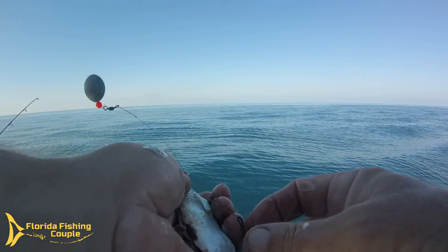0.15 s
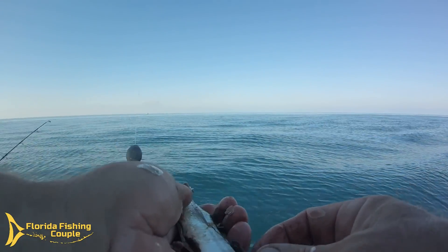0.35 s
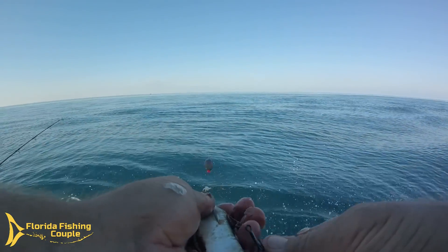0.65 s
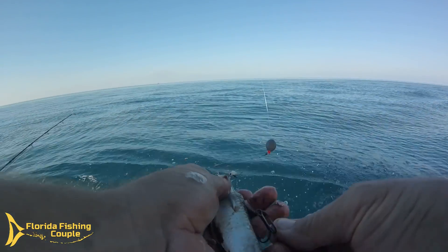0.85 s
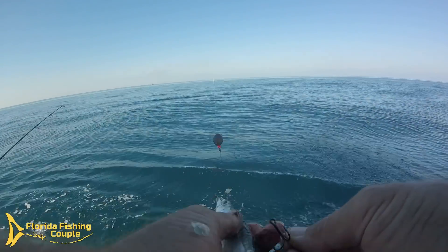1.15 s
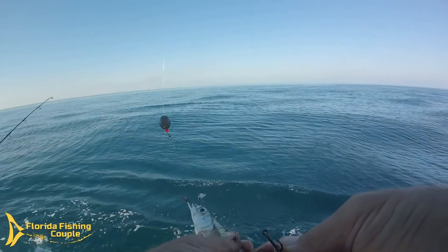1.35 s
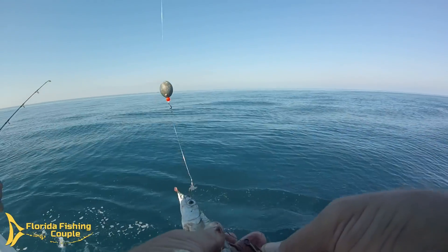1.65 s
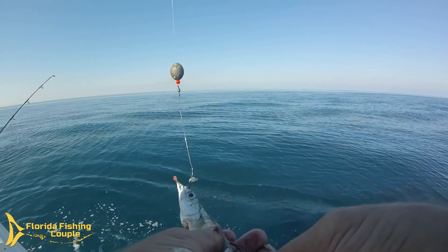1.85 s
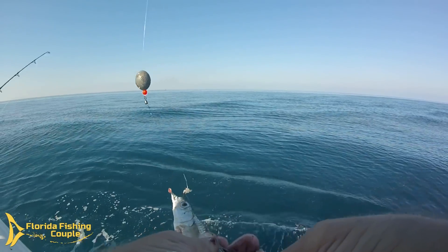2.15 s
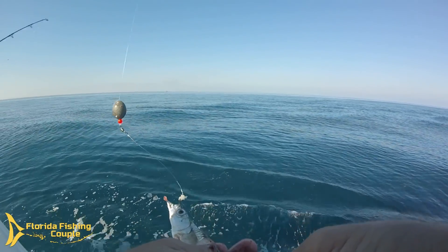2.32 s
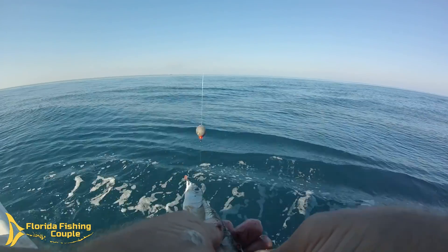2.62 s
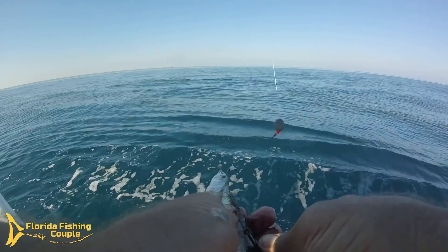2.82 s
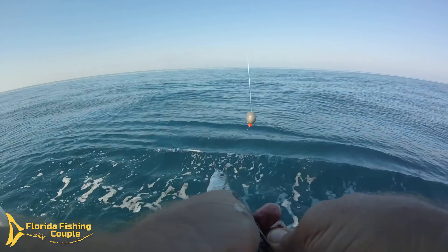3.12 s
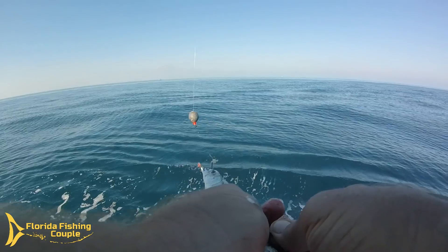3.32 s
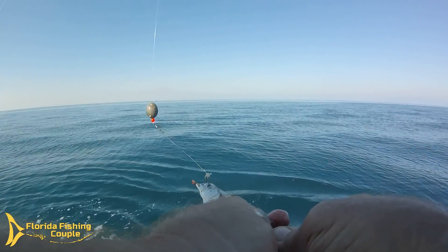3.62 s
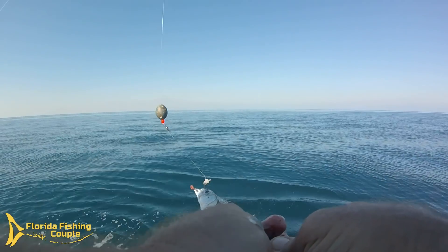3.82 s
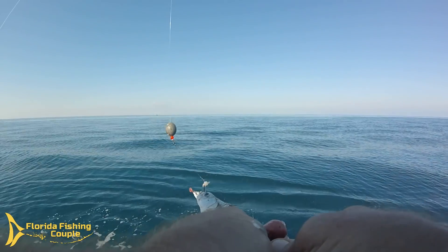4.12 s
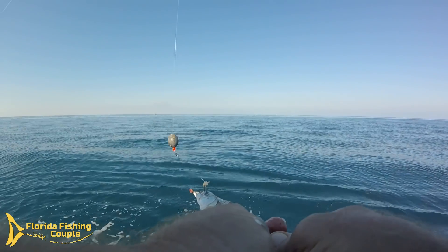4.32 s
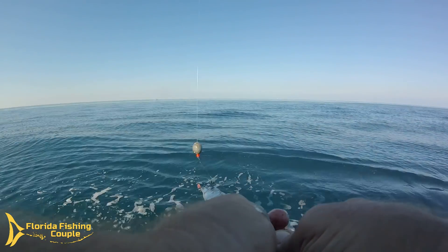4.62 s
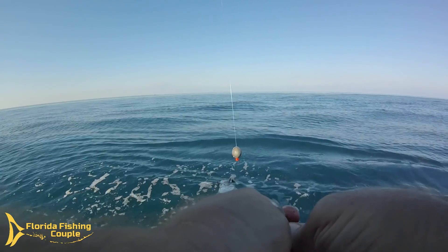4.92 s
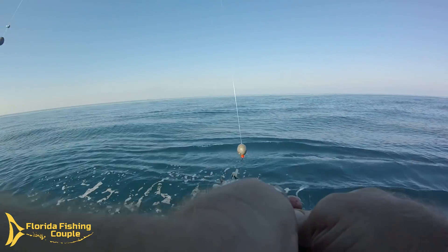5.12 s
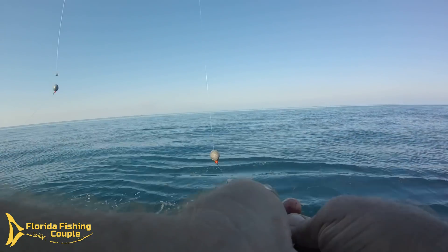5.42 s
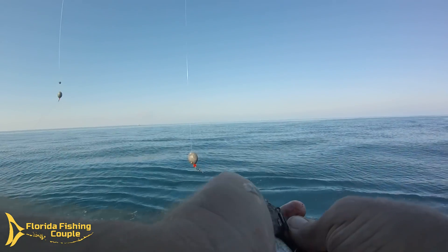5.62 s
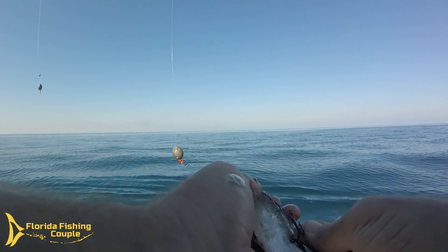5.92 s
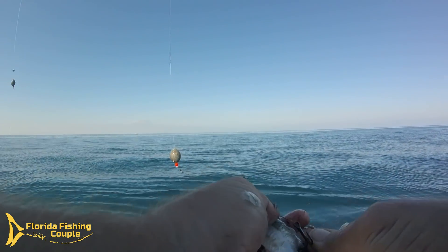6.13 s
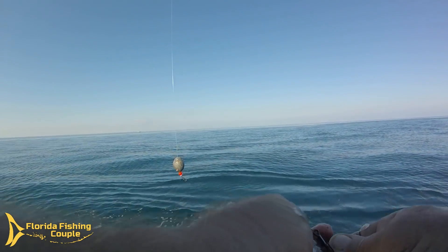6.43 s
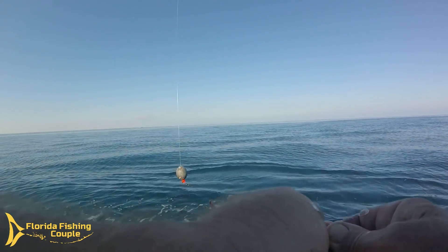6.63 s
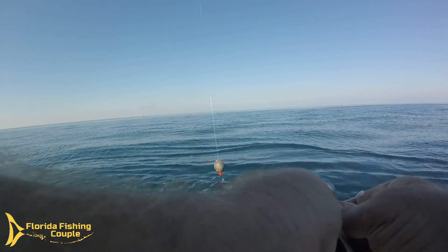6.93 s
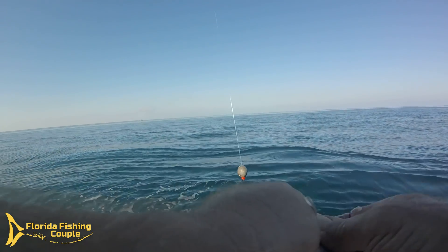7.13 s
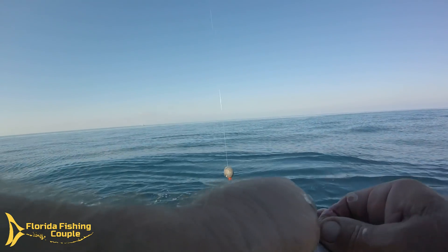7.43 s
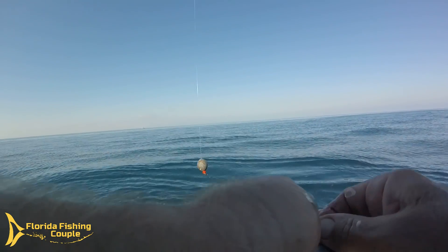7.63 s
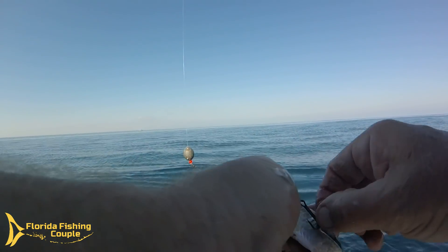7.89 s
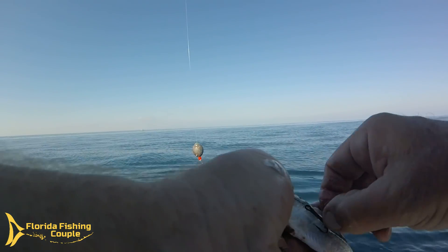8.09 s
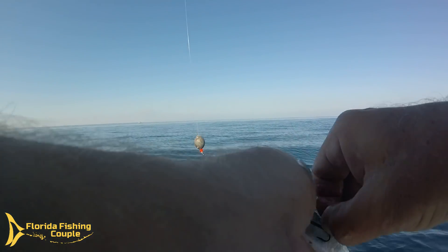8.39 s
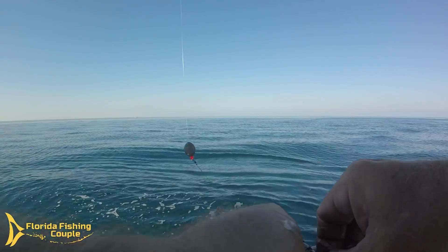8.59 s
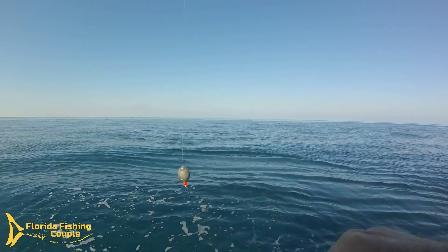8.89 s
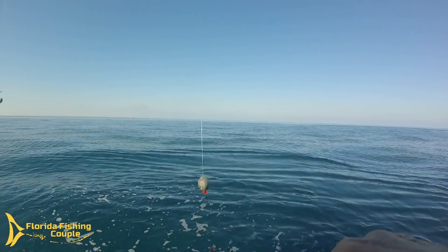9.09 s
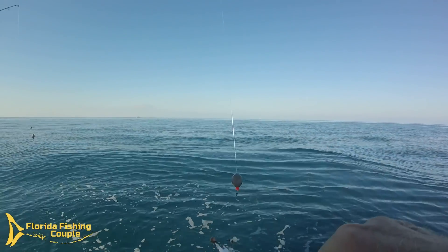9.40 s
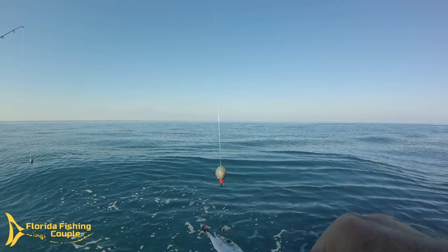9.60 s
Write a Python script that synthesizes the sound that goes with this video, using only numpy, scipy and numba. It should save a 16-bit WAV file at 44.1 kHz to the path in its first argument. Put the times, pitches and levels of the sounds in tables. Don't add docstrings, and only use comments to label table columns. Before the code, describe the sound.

Close water slaps and gurgles under a boat on calm sea, busiest in the first five seconds, then sparse laps over soft breeze rumble.

```python
import sys
import numpy as np
from scipy import signal
from scipy.fft import rfft, irfft
from scipy.io import wavfile
from scipy.ndimage import uniform_filter1d
from numba import njit

SR = 44100
rng = np.random.default_rng(int(sys.argv[2]) if len(sys.argv) > 2 else 0)


def level_to_linear(level):
    exponent = np.asarray(level, float) / 20
    return 10 ** exponent


def unload_wav(signal):
    wavfile.write(
        sys.argv[1],
        SR,
        np.round(np.clip(np.atleast_2d(signal).T, -1, 1) * 32767).astype(np.int16),
    )


N = 429974

# (time [s], crack level [dB], pocket pitch [Hz], pocket level [dB], spray level [dB])
HARD_SLAPS = [(0.441, -37, 243, -30, -29), (0.463, -16, 600, -16, -46), (0.662, -29, 700, -34, -38),
              (0.692, -30, 477, -11.5, -51), (0.883, -38, 400, -21.5, -38), (1.228, -29, 579, -48, -47),
              (1.672, -24.5, 270, -25, -71), (2.411, -34, 398, -42, -37), (2.44, -34, 210, -27, -38),
              (2.632, -27, 301, -29, -42.5), (2.651, -31, 640, -36, -39), (6.483, -42, 1180, -42, -58),
              (0.739, -32, 302, -28, -36), (2.464, -26, 395, -15, -44), (2.66, -36, 220, -29, -43),
              (2.681, -13, 690, -11.5, -26.5), (2.831, -29, 202, -46, -51), (3.863, -31, 205, -46, -44),
              (3.989, -34, 743, -28, -47), (4.431, -40, 200, -34, -44), (4.454, -33, 222, -31, -43),
              (4.485, -25, 778, -47, -43), (4.542, -23.5, 248, -33, -35.5), (6.503, -22, 358, -18, -43),
              (8.128, -37, 865, -58, -42.5), (8.15, -43, 950, -43, -35), (8.472, -32.5, 226, -53, -47.5),
              (8.846, -38, 256, -24, -52)]
# (time
# [s], crack level [dB], pocket pitch [Hz], pocket level [dB])
SOFT_LAPS = [(0.282, -40, 630, -38), (1.577, -29, 600, -36), (1.5, -54, 330, -32.5), (1.703, -35, 290, -20),
             (1.897, -34, 410, -26.5), (2.783, -43, 490, -29), (3.517, -37, 366, -33),
             (3.575, -48, 570, -39), (3.629, -39, 390, -38), (3.824, -34, 202, -40), (3.939, -31, 190, -30),
             (4.524, -40, 280, -21), (6.515, -29, 320, -21), (6.607, -39, 300, -40), (9.214, -38, 320, -45),
             (4.332, -31.5, 537, -37), (4.582, -29, 1200, -33), (4.756, -32, 230, -46),
             (4.79, -36, 900, -45), (6.68, -38, 2300, -37), (6.504, -34, 1500, -30),
             (6.513, -40, 1200, -26), (4.547, -38, 1800, -28), (0.455, -24, 2000, -26),
             (5.171, -36, 1700, -40), (4.558, -45, 327, -20), (2.493, -32, 340, -20),
             (4.875, -34.5, 170, -40), (4.951, -35.5, 245, -31), (5.3, -43, 1200, -44),
             (8.434, -46, 3100, -48), (5.722, -42, 1500, -48), (2.482, -40, 210, -18),
             (8.178, -44, 2200, -42), (7.038, -36.5, 380, -37.5), (7.826, -50, 340, -39),
             (8.517, -40, 220, -40), (8.565, -34, 277, -32.5), (8.827, -45, 220, -42),
             (8.846, -40, 2000, -33), (2.476, -19, 280, -29), (4.511, -29, 1450, -28), (0.9, -38, 120, -21)]
# (crest time [s], 10 dB fall time [ms], gulping [dB], bubbling [dB], spray [dB])
SWELLS = [(0.027, 150, -53, -61, -64), (0.755, 850, -61, -46, -54), (0.81, 230, -32.5, -63, -42.5),
          (1.86, 390, -36, -42, -57), (2.668, 294, -34.5, -46, -53.5), (3.892, 1171, -46.5, -50.5, -65),
          (4.667, 252, -39.5, -47.5, -59), (5.935, 413, -49, -51.5, -63.5), (6.657, 195, -45.5, -54.5, -67),
          (6.875, 313, -51.5, -59.5, -69), (8.924, 494, -50.5, -58.5, -68.5)]
# (peak time [s], 10 dB fall time [ms], level [dB])
GULPS = [(0.002, 109, -35.5), (0.36, 84, -35.5), (0.477, 23, -20.5), (0.717, 53, -24.5), (0.886, 50, -28),
         (1.374, 67, -38.5), (1.5, 22, -29.5), (1.716, 300, -35), (2.47, 40, -22), (2.682, 33, -23.5),
         (2.854, 82, -35), (3.333, 69, -43.5), (3.475, 76, -42.5), (3.565, 24, -36), (3.829, 200, -33.5),
         (4.549, 69, -24.0), (4.6, 80, -51), (4.759, 23, -26), (4.825, 136, -37), (5.3, 210, -49),
         (5.781, 22, -36), (5.947, 228, -48), (6.516, 28.5, -23.5), (7.53, 44, -47.5), (7.59, 35, -36),
         (8.516, 69, -37), (8.852, 22, -34.5), (9.228, 25, -40)]
# (peak time [s], 10 dB fall time [ms], bubbling level [dB], spray level [dB])
SPLASHES = [(0, 120, -36, -43), (0.46, 32, -22, -27.5), (0.695, 26, -28.5, -74.0), (0.775, 170, -33, -35.5),
            (0.878, 41, -32, -35), (1.238, 135, -40, -46.5), (1.698, 218, -40.5, -73),
            (1.951, 131, -36.5, -48.5), (2.447, 35, -28, -37), (2.472, 38, -31, -45), (2.677, 72, -30, -45),
            (2.821, 252, -42, -52.5), (3.7, 226, -45, -57.5), (3.911, 158, -39, -49.5),
            (4.07, 25, -45, -56), (4.5, 126, -55, -48), (4.53, 17, -32, -39.5), (4.765, 120, -44.5, -51),
            (5.177, 64, -49.5, -63), (5.383, 310, -54, -63.5), (5.928, 300, -69, -58),
            (6.233, 18, -50, -48), (6.516, 25, -31, -41), (6.61, 156, -55, -63), (6.632, 39, -60, -52),
            (0.925, 38, -37, -44), (6.87, 74, -51.5, -79), (8.156, 24.5, -42, -43), (8.512, 93, -44.5, -62),
            (8.775, 22, -54, -47), (8.845, 24, -43.5, -52), (9.05, 66, -55.5, -80), (9.23, 30, -49, -64)]
# (time [s], pitch [Hz], level [dB])
PLOPS = [(0.012, 1164, -39), (0.285, 820, -45), (0.462, 1176, -30), (0.608, 810, -51), (0.695, 713, -23),
         (0.86, 370, -24), (0.873, 390, -34), (0.884, 1140, -40), (0.901, 414, -29), (1.025, 910, -48),
         (1.136, 825, -43), (1.148, 369.5, -37), (1.553, 1030, -47), (1.737, 1090, -39), (1.911, 416, -33),
         (2.015, 338, -25), (2.067, 407, -28.5), (2.226, 897, -47), (1.792, 1450, -41), (2.454, 390, -19.5),
         (2.467, 387, -22), (2.482, 700, -31), (2.683, 1126, -32), (3.464, 946, -47), (3.548, 410, -31),
         (3.61, 372, -33), (3.771, 300, -31), (3.906, 1215, -39), (3.944, 1290, -40), (4.08, 670, -41),
         (4.093, 317, -34), (4.268, 1150, -47), (4.336, 540, -46), (4.364, 900, -45), (4.39, 850, -50),
         (4.502, 750, -35), (4.6, 1130, -43), (4.738, 1110, -41), (4.825, 295, -28.5), (4.88, 788, -42),
         (3.752, 1450, -45), (5.177, 1090, -48), (5.388, 950, -50), (5.655, 938, -54), (6.179, 643, -46),
         (6.254, 318, -37.5), (6.508, 347, -21), (6.527, 1215, -43), (6.635, 735, -45), (6.73, 1260, -54),
         (6.809, 1170, -53), (6.921, 425, -46), (6.952, 790, -48), (7.613, 322, -41), (8.111, 880, -56),
         (8.159, 954, -44), (8.831, 784, -47), (8.848, 1250, -49), (8.95, 730, -50), (8.015, 700, -56)]
# (time [s], pitch [Hz], level [dB])
PLINKS = [(0.002, 4480, -44), (0.444, 6420, -37), (0.461, 6500, -30), (0.472, 6610, -30),
          (0.508, 2270, -35), (0.708, 4520, -38), (0.724, 5150, -42), (0.741, 3440, -29),
          (0.756, 5060, -43), (0.82, 6460, -40), (0.877, 6050, -38), (0.884, 2090, -27), (0.901, 2580, -32),
          (1.018, 3620, -41), (1.42, 2006, -42), (1.443, 6570, -45.5), (1.758, 1750, -34),
          (1.788, 3880, -44), (2.306, 2360, -45), (2.414, 1440, -26), (2.443, 6350, -43),
          (2.476, 1520, -28), (2.496, 5120, -47), (2.683, 2070, -22), (2.741, 4750, -43),
          (3.318, 5790, -48.5), (3.676, 6400, -52), (3.864, 5370, -42), (3.993, 6320, -45.5),
          (4.055, 5900, -42), (4.066, 1735, -39), (4.433, 6340, -43), (4.489, 1430, -28.5),
          (4.527, 6330, -38), (4.549, 6470, -35.5), (4.591, 3790, -54), (4.786, 6370, -48),
          (4.433, 2050, -40), (5.584, 3035, -56), (5.722, 2000, -48), (5.914, 2000, -44.5),
          (6.248, 4870, -54), (6.505, 6740, -35), (6.518, 3800, -52), (6.529, 1550, -24),
          (6.535, 5060, -47), (6.564, 4010, -58), (6.576, 5330, -46), (7.074, 6300, -48),
          (7.247, 5270, -53), (8.133, 4900, -46), (8.151, 6400, -41), (8.771, 6030, -44),
          (8.849, 1640, -33), (9.088, 3230, -51.5)]
# (time [s], start pitch
# [Hz], end pitch [Hz], length [s], level [dB])
SINGING_BUBBLES = [(2.114, 490, 790, 0.034, -48), (2.196, 756, 930, 0.018, -50),
                   (2.25, 860, 1300, 0.024, -47), (2.298, 230, 240, 0.035, -36.5),
                   (2.358, 836, 1100, 0.017, -55), (2.84, 195.6, 213, 0.1, -43),
                   (3.12, 450, 508, 0.13, -57), (3.517, 366, 411, 0.071, -41.5),
                   (4.035, 180, 760, 0.055, -40), (4.288, 560, 1080, 0.04, -53),
                   (5.015, 580, 860, .03, -53), (4.33, 539, 527, 0.043, -48), (4.381, 825, 870, 0.016, -42),
                   (5.17, 1055, 1150, 0.02, -48), (5.43, 150, 140, .09, -46), (0.48, 127, 86, 0.07, -26),
                   (5.93, 206.4, 223, 0.21, -49), (6.045, 512, 720, 0.028, -49.5),
                   (6.833, 424, 471, 0.091, -51.5), (7.05, 171.4, 151, 0.16, -48),
                   (8.967, 735, 740, 0.026, -55), (6.76, 134, 150, 0.18, -48), (6.98, 145, 159, 0.055, -49),
                   (8.95, 131, 162, 0.059, -50), (9.125, 134.5, 174, 0.08, -49),
                   (4.254, 956, 1200, 0.019, -53), (8.946, 437, 453, 0.088, -56.5),
                   (9.049, 199, 800, 0.066, -49), (9.215, 292, 127, 0.026, -39.5),
                   (7.503, 150.3, 124, 0.03, -38.5)]
# (time [s], peak level [dB])
SMACKS = [(2.6314, -33), (2.6534, -31), (2.9966, -37), (4.4313, -31), (4.6189, -43), (4.6364, -38),
          (4.6798, -42), (4.7501, -38), (4.7684, -35), (4.8054, -43), (4.9596, -44), (8.4706, -44)]
# (peak time [s], 10 dB fall time [ms], level [dB])
GUSTS = [(0.012, 19, -35.0), (0.513, 60, -25), (0.77, 50, -26.5), (0.935, 144, -33.5), (1.266, 29, -33.5),
         (1.406, 47, -31.5), (1.665, 159, -33.5), (2.022, 91, -28.5), (2.291, 64, -35.0),
         (2.508, 66, -22.5), (2.679, 398, -33.5), (2.817, 31, -32), (3.33, 54, -17), (3.475, 61, -21),
         (3.82, 157, -31.5), (4.159, 24, -41), (4.61, 126, -32.5), (5.167, 29, -37), (5.421, 60, -34.5),
         (5.736, 800, -44), (5.739, 38, -36), (6.221, 241, -39), (6.561, 93, -34.5), (7.262, 71, -38.5),
         (7.503, 125, -37.5), (7.776, 61, -39), (8.185, 43, -46), (8.508, 84, -26.5), (8.863, 53, -41),
         (9.115, 121, -39.5)]
# (frequency [Hz], density [dB per Hz])
SPLASH_SPECTRUM = [(55, -34.5), (90, 1.5), (190, -1.5), (290, -5), (390, -5.5), (550, -9), (700, -9),
                   (1340, -16.5), (2100, -20.5), (4200, -36), (5000, -29), (6400, -31.5), (7300, -38),
                   (11500, -52.5), (15000, -83)]
# (frequency [Hz], density [dB per Hz])
BUFFET_SPECTRUM = [(12, -36), (20, -5), (35, 1), (60, 0), (95, -3), (145, -16), (231, -23.5), (390, -67),
                   (900, -120)]
# (frequency [Hz], density [dB per Hz])
HISS_SPECTRUM = [(60, -34.5), (100, 0.5), (284, -14), (420, -21), (560, -26), (2350, -28), (4400, -37.5),
                 (5200, -44), (6500, -24.5), (7500, -27), (10500, -34), (12000, -32), (13500, -36.5),
                 (15000, -64)]

SWELL_RISE, GULP_RISE, SPLASH_RISE, GUST_RISE = 0.67, 0.46, 0.43, 0.62
CALM_GULP_DB, CALM_BUBBLE_DB, CALM_SPRAY_DB, CALM_BREEZE_DB = -63, -64.5, -71.5, -51


def slaps(crack_s=0.0045, rise_s=0.00076, pocket_cycles=11, sag=0.75):
    lap_spray_db = -44
    laps = [(*lap, lap[1] + lap_spray_db) for lap in SOFT_LAPS]
    s, crack_db, hz, pocket_db, spray_db = np.transpose(HARD_SLAPS + laps)
    out = ring(N, s * SR, hz, pocket_cycles + 0 * s, sag + 0 * s, level_to_linear(pocket_db + 0.5), 0.18)
    t = np.arange(SR // 20) / SR
    burst = np.exp(-t / crack_s) * (1 - np.exp(-t / rise_s))
    for db, lo_hz, hi_hz, gain_db in ((crack_db, 500, 3800, -4), (spray_db, 3000, 11000, 1.5)):
        kicks = np.zeros(N)
        kicks[(s * SR).astype(int)] = level_to_linear(db + gain_db)
        envelope = np.maximum(signal.fftconvolve(kicks, burst)[:N], 0)
        grit = colour(rng.standard_normal(N), SPLASH_SPECTRUM)
        grit = level(band(grit, lo_hz, hi_hz), 0) * envelope
        out = out + band(grit, 0.92 * lo_hz, 0.88 * hi_hz)
    return out


def waves():
    swell = [surge(SWELLS, column, SWELL_RISE) for column in range(2, 5)]
    gulp_power = level_to_linear(2 * CALM_GULP_DB) + swell[0] + surge(GULPS, column=2, rise=GULP_RISE)
    bubble_power = level_to_linear(2 * CALM_BUBBLE_DB) + swell[1] + surge(SPLASHES, column=2, rise=SPLASH_RISE)
    spray_power = level_to_linear(2 * CALM_SPRAY_DB) + swell[2] + surge(SPLASHES, column=3, rise=SPLASH_RISE)
    gulps = swarm(85.0, 493.6, 12.0, 1.136, 1.5, -4.0, 2.5, count=1500)
    gulps = steady(band(gulps, 114, 600), 0.079)
    bubbles = steady(swarm(425.3, 4630, 24, 1.4, 2.8, -0.78, 1.3, count=5000), 0.064)
    spray = steady(swarm(3020, 12000, 12.8, 1.8, 4.1, -0.7, 3.3, count=15000), 0.046)
    out = gulps * np.sqrt(gulp_power) * level_to_linear(-0.74)
    out += bubbles * np.sqrt(bubble_power) * level_to_linear(-2.12)
    return out + spray * np.sqrt(spray_power) * level_to_linear(-1.33)


def swarm(lo_hz, hi_hz, cycles, glide, scatter_db, wash_db, flicker_db, count):
    when, pitch, loud, life, climb = rng.random((count, 5)).T
    hz = lo_hz * (hi_hz / lo_hz) ** pitch
    size = hz / lo_hz * level_to_linear(-scatter_db * np.log(1.03 - loud))
    lives = cycles * (0.25 + 1.8 * life) * (hz / lo_hz) ** 0.15
    near = ring(N, when * N, hz, lives, glide ** (2 * climb), size, 1.24)
    wash = band(rng.standard_normal(N), lo_hz, hi_hz)
    mix = (level(near, 0) + level(wash, wash_db)) * level_to_linear(flicker_db * walk(28))
    return level(band(colour(mix, SPLASH_SPECTRUM), lo_hz, hi_hz), 0)


def gurgles(count=320):
    when, pitch, loud, climb = rng.random((count, 4)).T
    hz = 377.8 * 3.2 ** pitch
    near = ring(N, when * N, hz, 62 * (0.382 + climb), 3.4 ** (0.405 + climb), level_to_linear(-13 * loud - 6 * pitch), 11.5)
    power = level_to_linear(2 * CALM_BUBBLE_DB) + surge(SWELLS, column=3, rise=SWELL_RISE)
    return level(near, -7.5) * np.sqrt(power)


def plips(rows, t60_s, lead_s, gain_db, glide, soft):
    s, hz, db = np.transpose(rows)
    start = np.maximum(s - lead_s, 0) * SR
    return ring(N, start, hz, t60_s * hz, glide + 0 * s, level_to_linear(db + gain_db), soft)


def singers():
    out, flutter = np.zeros(N), level_to_linear(3.2 * walk(45))
    for s, from_hz, to_hz, length_s, db in SINGING_BUBBLES:
        u = np.linspace(0, 1, int(length_s * SR))
        hz = from_hz * (to_hz / from_hz) ** u
        tone = np.sin(2 * np.pi * np.cumsum(hz) / SR)
        swell = np.sqrt(np.sin(np.pi * u).clip(0))
        i = int(s * SR)
        out[i:i + len(u)] += flutter[i:i + len(u)] * level_to_linear(db + 3.0) * swell * tone
    return out


def droplets(count=700):
    when, pitch, loud = rng.random((count, 3)).T
    size = level_to_linear(-2 * np.log(1.02 - loud))
    ticks = ring(N, when * N, 1500 * 4.6 ** pitch, 7 + 0 * when, 1.2 + 0 * when, size, 0.16)
    power = level_to_linear(2 * CALM_SPRAY_DB) + surge(SWELLS, column=4, rise=SWELL_RISE)
    power = power + surge(SPLASHES, column=3, rise=SPLASH_RISE)
    return level(ticks, -14) * np.sqrt(power)


def clicks():
    swivel, drops = np.zeros((2, N))
    swivel[int(7.073 * SR)] = level_to_linear(-14)
    s, db = np.transpose(SMACKS)
    drops[(s * SR).astype(int)] = level_to_linear(db + 16)
    return band(swivel, 5000, 10000) + band(drops, 3500, 7400)


def breeze():
    gust = np.sqrt(level_to_linear(2 * CALM_BREEZE_DB) + surge(GUSTS, column=2, rise=GUST_RISE))
    eddies = steady(colour(rng.standard_normal(N), BUFFET_SPECTRUM), 0.11)
    return eddies * gust * level_to_linear(-1.35 + 1.74 * walk(6))


def hiss():
    return level(colour(rng.standard_normal(N), HISS_SPECTRUM), -57.5)


def surge(rows, column, rise):
    t = np.arange(0, N + 64, 64) / SR
    rows = np.array(rows)
    fall_s = np.maximum(rows[:, 1:2] / 1000, 1e-3)
    u = (t - rows[:, :1]) / fall_s
    power = level_to_linear(2 * rows[:, column]) @ level_to_linear(-20 * np.maximum(u, -u / rise) ** 0.97)
    return np.interp(np.arange(N) / SR, t, power)


@njit
def ring(n, start, hz, cycles, glide, size, soft):
    out = np.zeros(n)
    for g in range(len(start)):
        steps = int(cycles[g] * SR / hz[g]) + 1
        fade, rise = 1000. ** (-1. / steps), glide[g] ** (1. / steps)
        w, phase, a, i0 = 2 * np.pi * hz[g] / SR, 0., size[g], int(start[g])
        for i in range(i0, min(i0 + steps, n)):
            out[i] += a * np.sin(phase) * min(phase / (2 * np.pi * soft), 1.)
            phase, w, a = phase + w, w * rise, a * fade
    return out


def steady(x, span_s):
    power = uniform_filter1d(x ** 2, int(span_s * SR))
    return level(x / np.sqrt(power + 0.021 * np.mean(x ** 2)), 0)


def walk(rate):
    k = int(SR / rate)
    held = np.repeat(rng.standard_normal(N // k + 1), k)
    return uniform_filter1d(uniform_filter1d(held, k), k)[:N] * 4 / 3


def colour(x, points, size=4096):
    hz, db = np.transpose(points)
    grid = np.maximum(np.arange(size // 2 + 1) * SR / size, 1)
    cep = irfft(np.log(level_to_linear(np.interp(np.log(grid), np.log(hz), db))))
    cep[1:size // 2] *= 2
    cep[size // 2 + 1:] = 0
    return signal.fftconvolve(x, irfft(np.exp(rfft(cep))))[:N]


def band(x, lo_hz, hi_hz):
    return signal.sosfilt(signal.butter(2, [lo_hz, hi_hz], "band", fs=SR, output="sos"), x)


def level(x, db):
    return x * level_to_linear(db) / np.sqrt(np.mean(x ** 2))


def scene():
    lone = plips(PLOPS, t60_s=0.058, lead_s=0.00601, gain_db=7.5, glide=1.12, soft=4.0)
    lone += plips(PLINKS, t60_s=0.016, lead_s=0.002, gain_db=5, glide=1.04, soft=1.4)
    water = slaps() + waves() + gurgles() + lone + singers() + droplets()
    return (water + clicks() + breeze() + hiss())[None]


def roll_off(x):
    return signal.sosfilt(signal.butter(12, 14490, fs=SR, output="sos"), x)


def record(dry):
    case_hz, case_width_hz, case_db = 6460, 195, 7.5
    dip_hz, dip_width_hz, dip_depth = 4300, 750, 0.21
    cavity = signal.lfilter(*signal.iirpeak(case_hz, case_hz / case_width_hz, fs=SR), dry[0])
    dip = signal.lfilter(*signal.iirpeak(dip_hz, dip_hz / dip_width_hz, fs=SR), dry[0])
    mix = dry[0] + (level_to_linear(case_db) - 1) * cavity - dip_depth * dip
    return roll_off(mix[None])


dry = scene()
out = record(dry)
unload_wav(out)
```